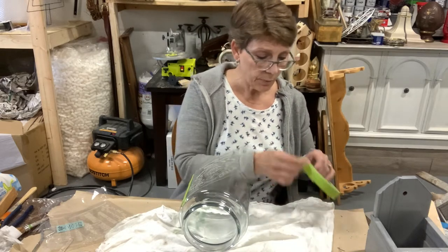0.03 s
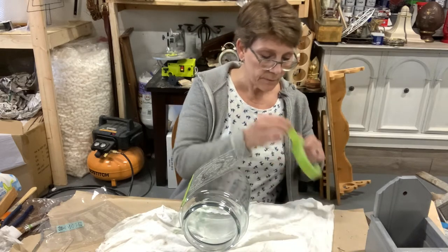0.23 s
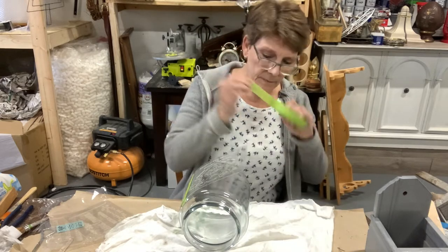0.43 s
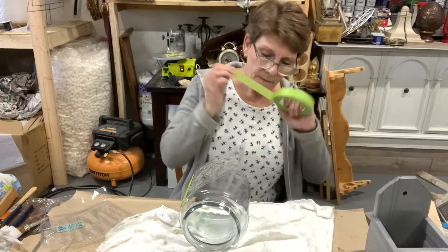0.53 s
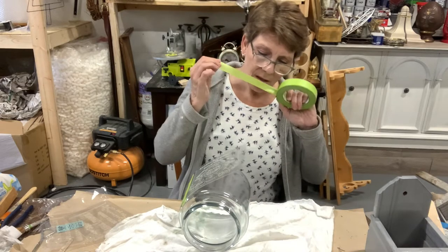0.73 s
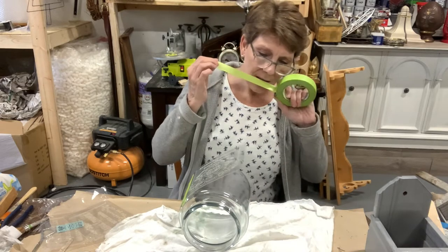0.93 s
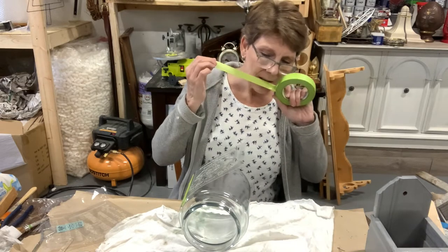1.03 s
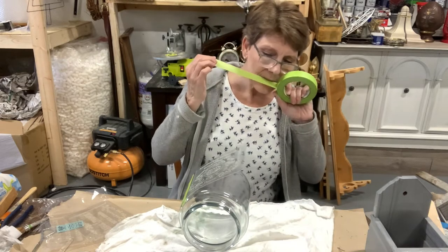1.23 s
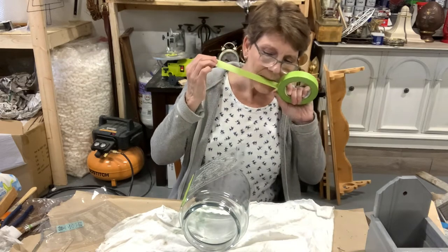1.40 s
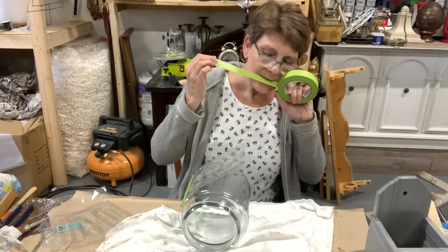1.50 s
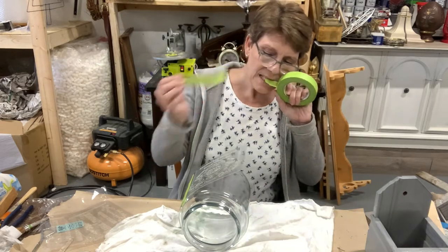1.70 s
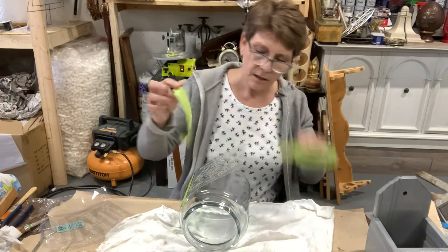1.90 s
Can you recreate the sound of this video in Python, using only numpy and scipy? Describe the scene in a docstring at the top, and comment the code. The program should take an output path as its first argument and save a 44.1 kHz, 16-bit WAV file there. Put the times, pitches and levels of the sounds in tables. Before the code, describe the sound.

A short rasp of tape peeling off a roll, then one sharp snap as it tears.

```python
"""Masking tape off the roll

A small workshop, close to the microphone: fingers rub a roll of paper tape and pick the end free.
The glue lets go in jerks that run together into a rasp; each jerk is a volley of tiny snaps that
also drums the free strip. About a second later the strip is torn off with one sharp click.
The room rings briefly behind it, over a steady low rumble."""
import sys
import numpy as np
from scipy import signal
from scipy.fft import rfft, irfft
from scipy.io import wavfile

SR = 44100
rng = np.random.default_rng(int(sys.argv[2]) if len(sys.argv) > 2 else 0)


def digitize_waveform(pressure):
    """Quantize a signal to 16-bit integers and store it at the path in sys.argv[1].

    Rows of a 2-D input are taken as channels; values are limited to [-1, 1].
    """
    field = np.atleast_2d(pressure).T
    bounded = np.clip(field, -1, 1)
    quanta = np.round(bounded * 32767).astype(np.int16)
    wavfile.write(sys.argv[1], SR, quanta)


N = 85995
T = np.arange(N) / SR

# jerks of the peel: start_s, length_s, crackle_db, tilt_db_per_octave, drum_db
PEEL_JERKS = [(0.303, .006, -56, 3, -80), (0.31, 0.024, -50.5, 3.5, -78), (0.3347, 0.011, -25, 1.5, -44.5),
              (.386, .011, -27.5, .5, -52), (.423, 0.019, -28, 0.5, -50.5),
              (0.4592, .017, -28.5, -.5, -50.5), (0.491, 0.013, -31, 0, -53.5),
              (0.513, .010, -34.5, 0, -47), (.525, .019, -29.5, -0.87, -41), (0.555, 0.019, -34, 1, -41.5),
              (0.574, 0.016, -32.5, -1.4, -48), (.608, 0.015, -31.5, -0.5, -40.5),
              (.623, .011, -32.5, 0.5, -40)]
# spectrum of a glue snap: frequency_hz, level_db
SNAP_COLOUR = [(88, -29.5), (150, -21), (205, -16.5), (275, -7.5), (398, -15), (589, -5), (805, -3.5),
               (1450, -4), (1900, -0.5), (2870, -1), (3550, -1.5), (7770, -1), (9260, -5), (14200, -8.5),
               (16000, -9.5)]
# note of the free strip as it is stretched: time_s, pitch_hz
STRIP_NOTE = [(.34, 494), (.39, 364), (.44, 286), (.495, 270), (.515, 592), (.55, 650), (.59, 527),
              (.63, 543)]
# modes of the free strip: pitch_ratio, width_hz, level_db
STRIP_MODES = [(1, 168, -2), (1.38, 146, -5), (2, 260, -10), (2.7, 200, -11)]
# single cracks of the glue: start_s, level_db, tilt_db_per_octave
GLUE_CRACKS = [(0.1584, -12, 6.5), (0.1643, -19.5, 9.5), (0.1713, -21, 9.5), (.325, -10.5, 0),
               (0.3365, -6, 1.5), (.3401, -10.5, 1), (0.3428, -10, 3.5), (.3818, -17, 0.5),
               (.3857, -8.5, 1), (0.3889, -6, 4), (.4245, -11, 0), (.4275, -14, 10), (0.4366, -18, 4.5),
               (0.442, -23, 4), (.4735, -13, 9), (0.5543, -19.5, 1), (0.5989, -17, 1.5),
               (0.6044, -16, -0.5), (.616, -16, 2.5), (1.7925, -43, 1.5)]
# ringing of the roll and the paper: pitch_hz, level_db, t60_s
ROLL_MODES = [(1920, -45.5, 0.033), (2393, -40, .045), (3630, -39, 0.034), (3910, -38, 0.03),
              (6490, -28, 0.0082), (7340, -26.5, 0.0064)]
# the tight roll rings at two hard cracks: start_s, level_db
ROLL_RINGS = [(0.326, -34), (0.3371, -31)]
# spectrum of the tear at the microphone: frequency_hz, level_db
TEAR_COLOUR = [(100, -33), (250, 3), (650, -3.5), (1100, -9), (2000, 1.5), (3200, -1.5), (4300, -4.5),
               (5500, -0.5), (7300, 7.5), (9000, 1), (11500, -1.5), (12800, 2), (16000, -12)]
# ringing of the torn strip: pitch_hz, level_db, t60_s
TEAR_MODES = [(1740, -36, 0.02), (2360, -33, 0.021), (3270, -35, .018), (5250, -34, .018),
              (7250, -30, 0.014)]
# fingers knock on the cardboard core: start_s, level_db, tilt_db_per_octave
CORE_KNOCKS = [(.160, -23, -3), (1.2805, -38, 3.5)]
# hollow ring of the core: pitch_hz, level_db, t60_s
CORE_MODES = [(380, -5.5, 0.049), (1000, -4, .025), (1300, -6, .025), (1850, -8, .02), (3400, -11, .015)]
# the roll shuddering in the hand: pitch_hz, width_hz, level_db
JUDDER_MODES = [(151, 50, 1), (270, 62, -1)]
# fingers and sleeves rubbing: time_s, level_db
BRUSH_LEVEL = [(0, -52), (.03, -59), (.06, -57.5), (.12, -59.5), (.17, -59), (.26, -78), (.32, -82)]
# spectrum of that rubbing: frequency_hz, level_db
BRUSH_COLOUR = [(59, -54), (100, -7.5), (1060, -5.5), (1460, -6.5), (2020, -29), (2470, -18.5), (3470, -33),
                (4150, -27.5), (12000, -38), (15600, -93), (22000, -120)]
# resonances under a dragging fingertip: pitch_hz, half_width_hz, level_db
DRAG_MODES = [(970, 130, 3.5), (1630, 300, 3.5), (4140, 280, -5.5), (4990, 120, 3), (6900, 1300, -15)]
# the taut strip rustling in the fingers: time_s, level_db
RUSTLE_LEVEL = [(.9, -76), (1.04, -66.5), (1.12, -77), (1.3, -78.5), (1.5, -82), (1.59, -67), (1.62, -73)]
# what the peel throws into the room: frequency_hz, level_db
PEEL_ROOM_COLOUR = [(200, 0), (550, -1), (1000, 4), (2000, 0), (7000, -1), (15000, -1)]
# what the tear throws sideways into the room: frequency_hz, level_db
TEAR_ROOM_COLOUR = [(150, -21), (500, -4.5), (1200, -7.5), (2400, -1), (4200, -4), (7400, 4), (10000, -3.5),
                    (13000, -4), (16000, -10)]
# decay of the workshop: frequency_hz, t60_s
ROOM_DECAY = [(150, 0.57), (600, 0.53), (2500, 0.78), (7000, 0.57), (15000, 0.53)]
# spectrum of the room tone: frequency_hz, level_db
ROOM_TONE_COLOUR = [(15, -66), (25, -35), (82, 1), (170, -5), (236, -7), (607, -11), (775, -13.5),
                    (1020, -15), (1650, -19), (1840, -21.5), (2610, -23.5), (3340, -23.5), (5430, -30.5),
                    (10400, -27), (16000, -34.5)]

ATTACK_S = 0.0013  # rise of a burst


def peel():
    """Each jerk is a volley of snaps that sounds the roll and drums the free strip."""
    train = snaps(per_s=520)
    train -= train.mean()
    note_hz = np.interp(T, *np.transpose(STRIP_NOTE))
    flutter = rng.standard_normal(N)
    drum = sum(amp(db) * band(flutter, note_hz * ratio, width) for ratio, width, db in STRIP_MODES)
    out = np.zeros(N)
    for start, length, crackle_db, tilt_db, drum_db in PEEL_JERKS:
        volley = train * gate(start, length, fall_s=0.003)
        crackle = through(volley, glue_snap(tilt_db))
        drumming = drum * gate(start, length, fall_s=0.0083)
        out += levelled(crackle, length, crackle_db) + levelled(drumming, length, drum_db)
    return out


def glue_snap(tilt_db):
    """The roll's answer to one snap: a tick, short modes and a spray from the paper."""
    roll = ringing(ROLL_MODES) + amp(1.5) * scatter(decay_s=0.0015)
    return signal.fftconvolve(roll, colour(SNAP_COLOUR, tilt_db))


def cracks():
    """Larger patches of glue let go all at once."""
    out = np.zeros(N)
    for start, db, tilt_db in GLUE_CRACKS:
        crack = amp(db) * glue_snap(tilt_db)
        out[round(start * SR):][:len(crack)] += crack
    return out


def roll_rings(pitch_hz=2454, t60_s=0.044, size=2048):
    """A hard crack leaves the wound roll ringing for a moment."""
    out, t = np.zeros(N), T[:size]
    for start, db in ROLL_RINGS:
        out[round(start * SR):][:size] += amp(db - 60 * t / t60_s) * np.sin(2 * np.pi * pitch_hz * t)
    return out


def tear(start_s=1.604, length_s=0.008, level_db=-27.5):
    """Fibres break in one quick run and the slack strip pops; gives direct sound and room feed."""
    run = gate(start_s - ATTACK_S / 2, length_s, fall_s=0.00072)
    first_break = signal.unit_impulse(N, round(start_s * SR))
    fibres = (snaps(per_s=1000) + 0.69 * rng.standard_normal(N)) * run + amp(19) * first_break
    strip = ringing(TEAR_MODES) + scatter(decay_s=0.0027) / 2
    rip = through(fibres, signal.fftconvolve(colour(TEAR_COLOUR), strip))
    pop = band(first_break, hz=656, width_hz=300)
    pop = np.roll(pop, round(length_s / 2 * SR))  # halfway through the run
    direct = levelled(rip, length_s, level_db) + levelled(pop, length_s, db=-44)
    thrown = through(first_break, colour(TEAR_ROOM_COLOUR))
    return direct, levelled(thrown, length_s, level_db)


def knocks(size=4096):
    """The cardboard core answers a finger with a dull tick and a short hollow ring."""
    out, t = np.zeros(N), T[:size]
    lowest_hz = CORE_MODES[0][0]
    for start, db, tilt_db in CORE_KNOCKS:
        ring = np.zeros(size)
        for hz, mode_db, t60 in CORE_MODES:
            tilted_db = mode_db + tilt_db * np.log2(hz / lowest_hz)
            ring += amp(tilted_db - 60 * t / t60) * np.cos(2 * np.pi * hz * t)
        spray = signal.fftconvolve(scatter(decay_s=0.003, size=size), colour(SNAP_COLOUR))[:size]
        tick = amp(2 + 2 * tilt_db) * spray / 2
        out[round(start * SR):][:size] += amp(db) * (ring / np.linalg.norm(ring) + tick)
    return out


def handling(drag_start_s=0.053, drag_length_s=0.052):
    """Sleeves brush, a fingertip drags over the roll, and the held strip rustles faintly."""
    brush = unit_rms(through(rng.standard_normal(N), colour(BRUSH_COLOUR)))
    brush *= amp(np.interp(T, *np.transpose(BRUSH_LEVEL), right=-120))
    slips = snaps(per_s=790) * gate(drag_start_s, drag_length_s, fall_s=0.023)
    drag = sum(amp(db) * band(slips, hz, 2 * half_width) for hz, half_width, db in DRAG_MODES)
    crinkle = snaps(per_s=400) + 0.8 * rng.standard_normal(N)
    rustle = unit_rms(through(crinkle, colour(SNAP_COLOUR, tilt_db=1)))
    rustle *= amp(np.interp(T, *np.transpose(RUSTLE_LEVEL)))
    return brush + levelled(drag, drag_length_s, db=-53.5) + rustle


def judder(start_s=0.55, length_s=0.073):
    """The turning core shudders against the fingers near the end of the pull."""
    shake = rng.standard_normal(N) * gate(start_s, length_s, fall_s=0.011)
    shudder = sum(amp(db) * band(shake, hz, width) for hz, width, db in JUDDER_MODES)
    return levelled(shudder, length_s, db=-56.5)


def workshop(build_up_s=0.0096):
    """Two paths to the microphone: direct with quick echoes off table and body, and a diffuse tail."""
    hz, t, spectra = signal.stft(rng.standard_normal(SR), SR, nperseg=256)
    decay = amp(-60 * t / at_frequency(ROOM_DECAY, hz)[:, None])
    tail = signal.istft(spectra * decay, SR, nperseg=256)[1][:SR]
    tail *= np.minimum(T[:SR] / build_up_s, 1)
    near = (T[:SR] == 0) + amp(-13.5) * scatter(decay_s=0.0073, size=SR)
    return near, tail / np.linalg.norm(tail)


def room_tone(level_db=-65.5):
    """Steady low rumble and faint hiss."""
    gain = amp(at_frequency(ROOM_TONE_COLOUR, np.fft.rfftfreq(N, 1 / SR)))
    spectrum = rfft(rng.standard_normal(N)) * gain
    return amp(level_db) * unit_rms(irfft(spectrum, N))


def snaps(per_s, jitter=0.35, spread_db=2.5, fizz=0.38, count=3000):
    """Unevenly spaced tiny snaps over a fine fizz."""
    gap, strength = rng.standard_normal((2, count))
    at = (np.cumsum(np.exp(jitter * gap)) / per_s * SR).astype(int)
    gain = amp(spread_db * np.clip(strength, -2, 2))
    train = np.bincount(at[at < N], gain[at < N], N)
    return unit_rms(train) + fizz * rng.standard_normal(N)


def ringing(modes, size=2048):
    """A tick followed by dying modes."""
    t = T[:size]
    return (t == 0) + sum(amp(db - 60 * t / t60) * np.cos(2 * np.pi * hz * t) for hz, db, t60 in modes)


def scatter(decay_s, size=2048):
    """A short dying spray of echoes, of unit energy."""
    age = T[:size] / decay_s
    spray = rng.standard_normal(size) * np.exp(-age) * (1 - np.exp(-4 * age))
    return spray / np.linalg.norm(spray)


def colour(points, tilt_db=0, dispersion_s=0.000489, size=2048):
    """Unit-energy response with this spectrum and tilt per octave; in paper the lows travel slower."""
    hz = abs(np.fft.fftfreq(size, 1 / SR))
    db = at_frequency(points, hz) + tilt_db * np.log2(np.maximum(hz, 500) / 4000)
    minimum_phase = np.exp(signal.hilbert(np.log(amp(db))).conj())[:size // 2 + 1]
    delay_s = dispersion_s * np.linspace(1, 0, len(minimum_phase))
    lag = np.exp(-2j * np.pi * np.cumsum(delay_s) * SR / size)
    response = irfft(minimum_phase * lag)[:size // 2]
    return response / np.linalg.norm(response)


def band(x, hz, width_hz):
    """A resonance that can follow a pitch curve, applied twice for steep skirts."""
    turn = np.exp(2j * np.pi * np.cumsum(hz * np.ones(N)) / SR)
    pole = np.exp(-np.pi * width_hz / SR)
    for _ in range(2):
        x = 2 * (turn * signal.lfilter([1 - pole], [1, -pole], x / turn + 1e-18)).real
    return x


def gate(start_s, length_s, fall_s):
    """Attack, hold and exponential release."""
    attack = np.clip((T - start_s) / ATTACK_S, 0, 1)
    return attack * np.exp(-np.maximum(T - start_s - length_s, 0) / fall_s)


def levelled(x, length_s, db):
    """Sets a burst's level over its length."""
    return x * amp(db) * np.sqrt(length_s * SR / (np.sum(x ** 2) + 1e-20))


def through(x, response):
    """Convolves and keeps the scene's length."""
    return signal.fftconvolve(x, response)[:N]


def at_frequency(points, hz):
    """Reads a curve on a log-frequency axis."""
    point_hz, value = np.transpose(points)
    return np.interp(np.log(hz + 1), np.log(point_hz), value)


def amp(db):
    """Decibels to gain."""
    return 10 ** (np.asarray(db) / 20)


def unit_rms(x):
    """Scales to an rms of one."""
    return x / np.sqrt(np.mean(x ** 2) + 1e-20)


def scene():
    """Peel, handling and tear close to one microphone, with the workshop behind."""
    near, tail = workshop()
    pull = peel() + cracks() + roll_rings() + handling() + knocks() + judder()
    pull_tail = amp(-13) * signal.fftconvolve(tail, colour(PEEL_ROOM_COLOUR))[:SR]
    pull_at_mic = through(pull, near + pull_tail)
    rip, thrown = tear()
    tear_at_mic = through(rip, near) + amp(-11.5) * through(thrown, tail)
    return (pull_at_mic + tear_at_mic + room_tone())[None]


def record(dry):
    """The recorder's band limit at 16 kHz."""
    lowpass = signal.firwin(511, 16000, window=("kaiser", 9), fs=SR)
    return signal.oaconvolve(dry, lowpass[None], "same")


dry = scene()
out = record(dry)
digitize_waveform(out)
```